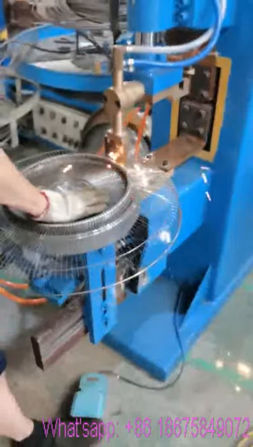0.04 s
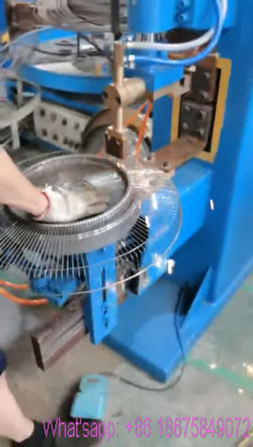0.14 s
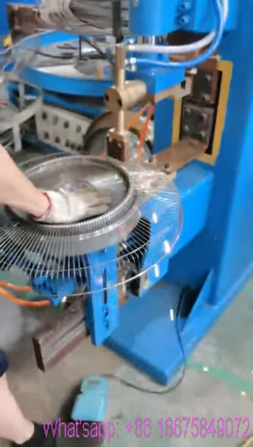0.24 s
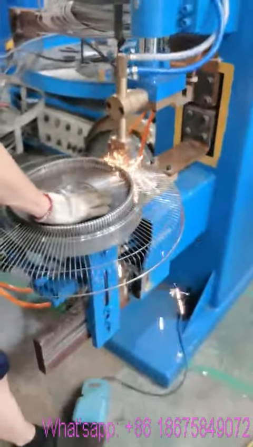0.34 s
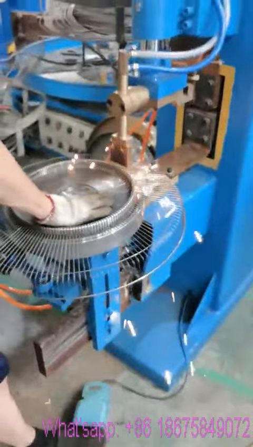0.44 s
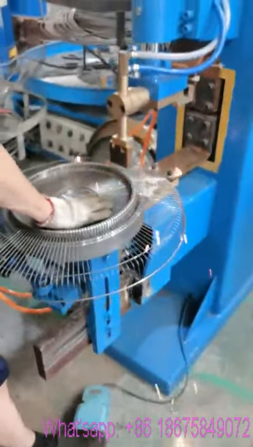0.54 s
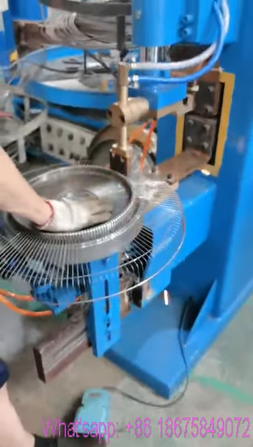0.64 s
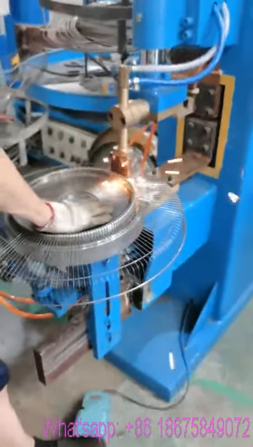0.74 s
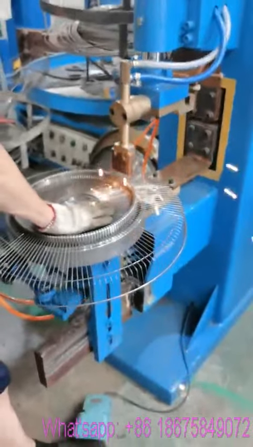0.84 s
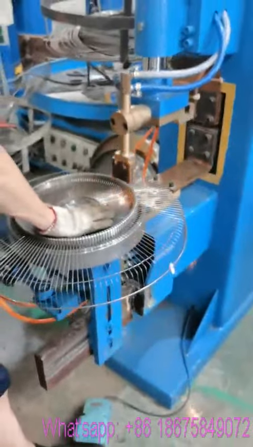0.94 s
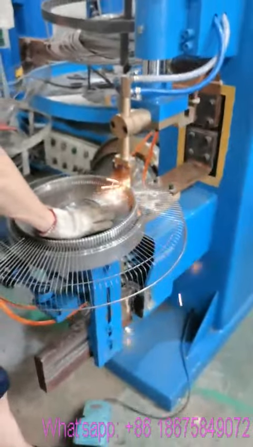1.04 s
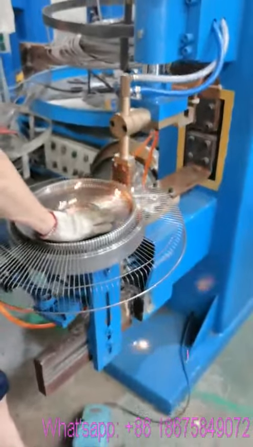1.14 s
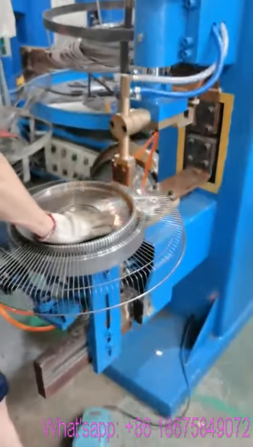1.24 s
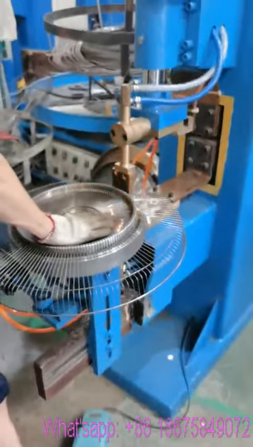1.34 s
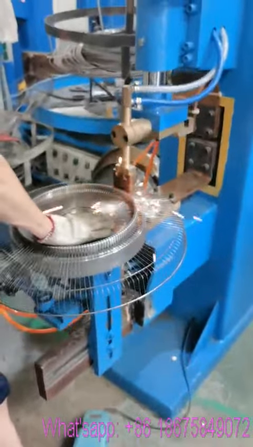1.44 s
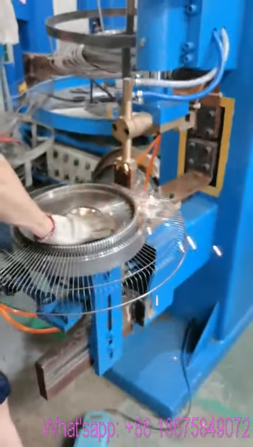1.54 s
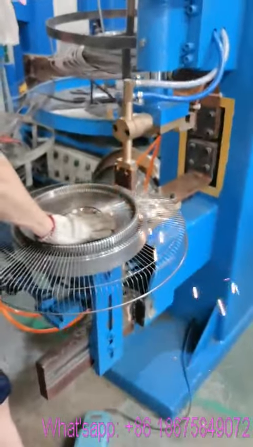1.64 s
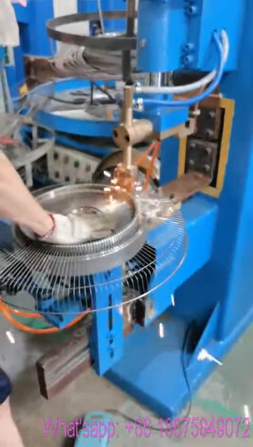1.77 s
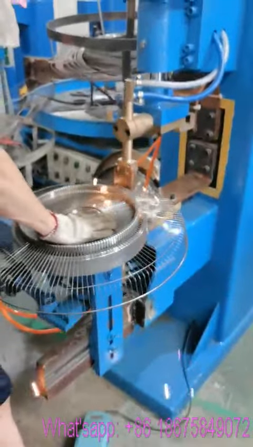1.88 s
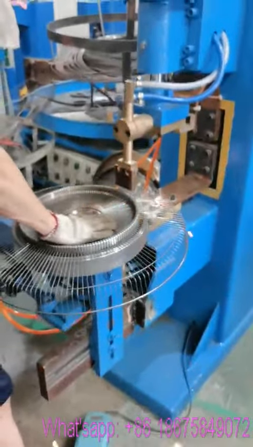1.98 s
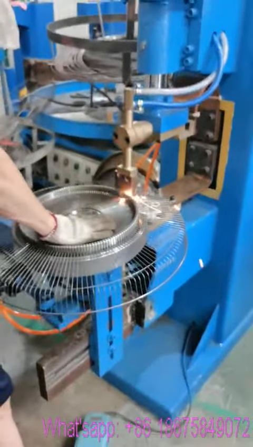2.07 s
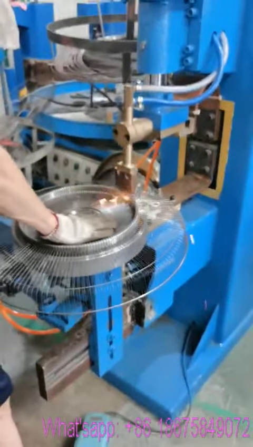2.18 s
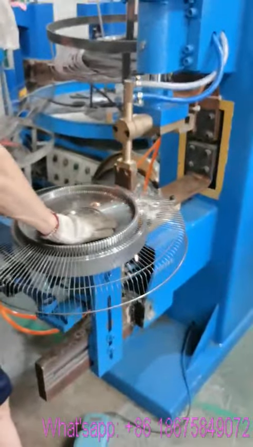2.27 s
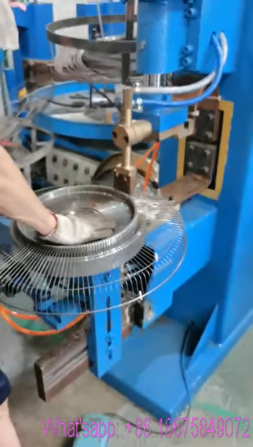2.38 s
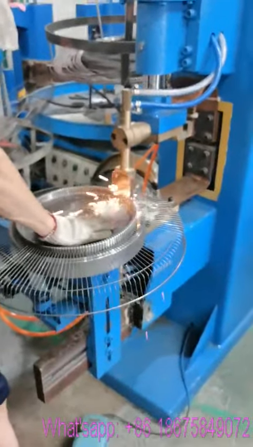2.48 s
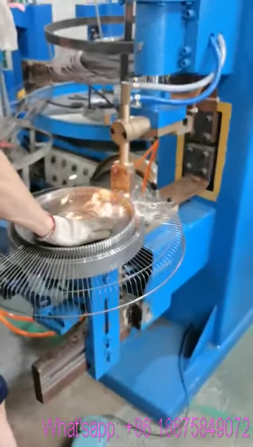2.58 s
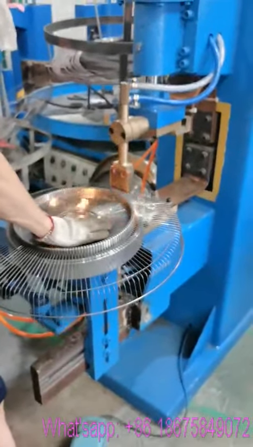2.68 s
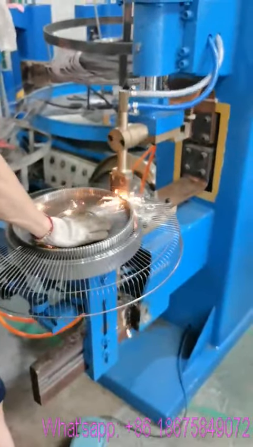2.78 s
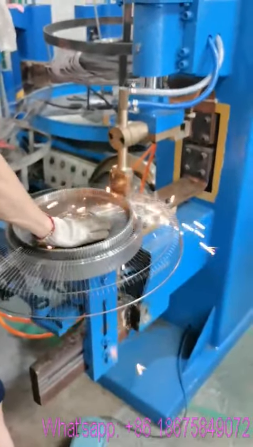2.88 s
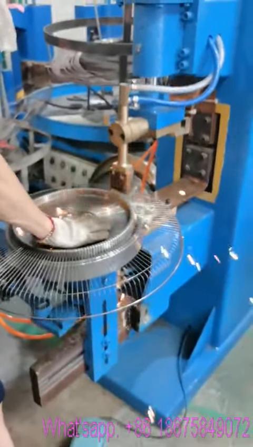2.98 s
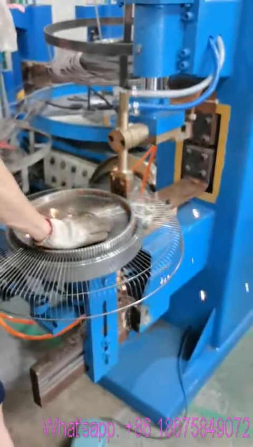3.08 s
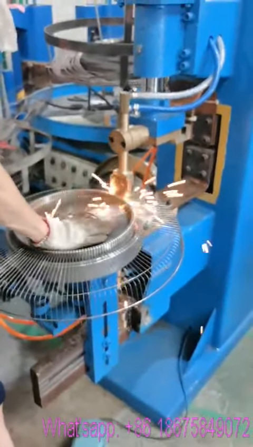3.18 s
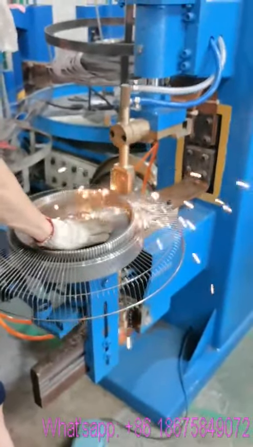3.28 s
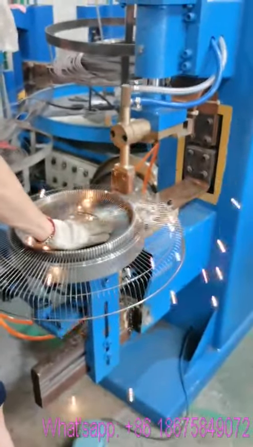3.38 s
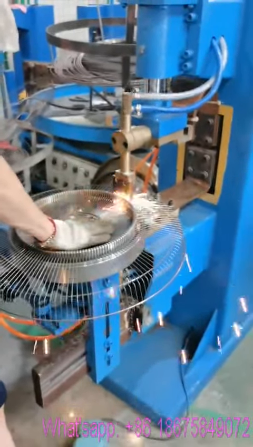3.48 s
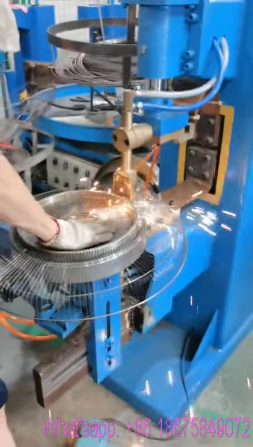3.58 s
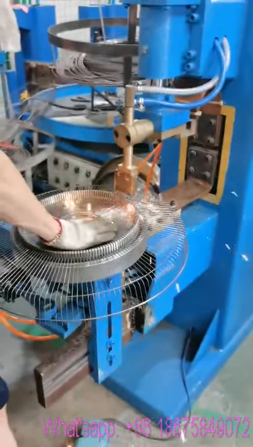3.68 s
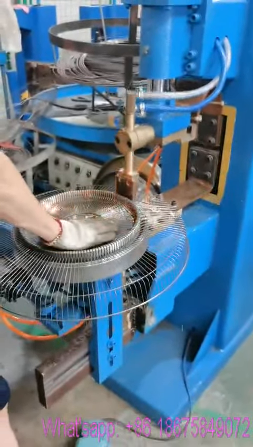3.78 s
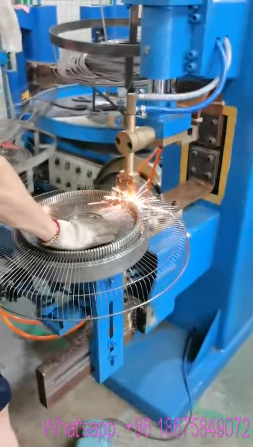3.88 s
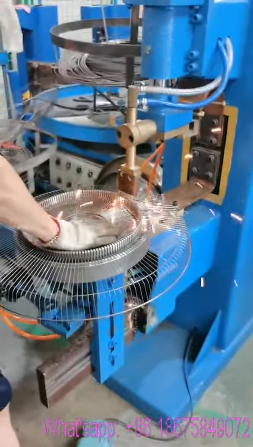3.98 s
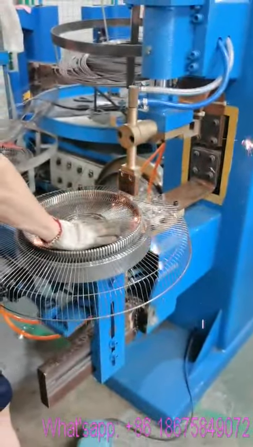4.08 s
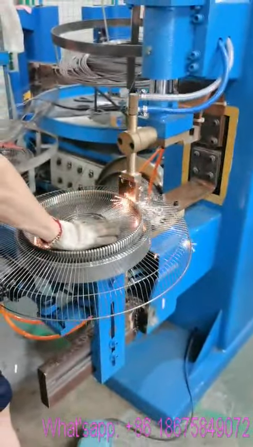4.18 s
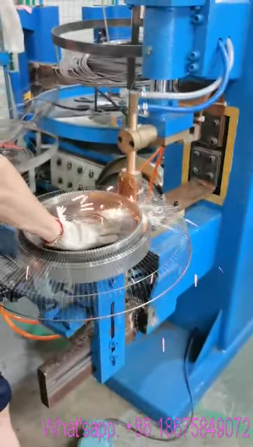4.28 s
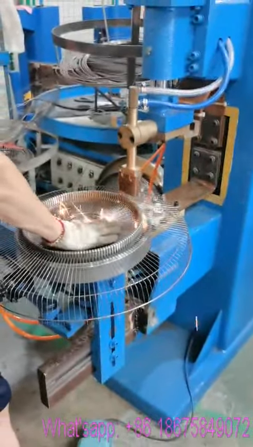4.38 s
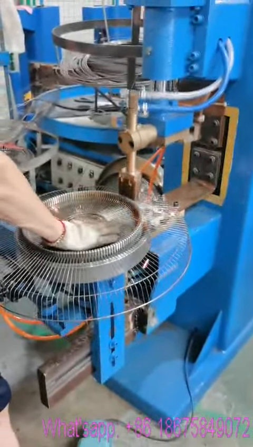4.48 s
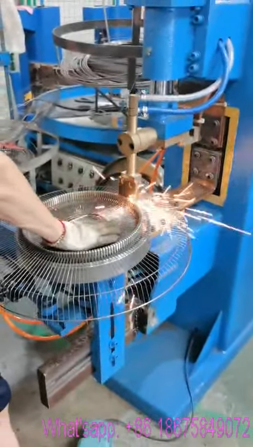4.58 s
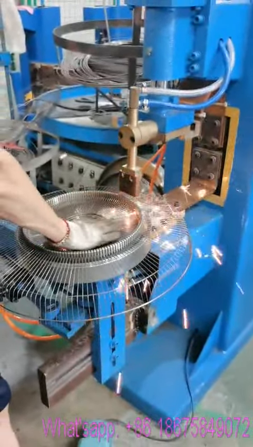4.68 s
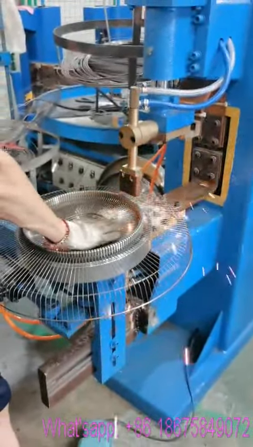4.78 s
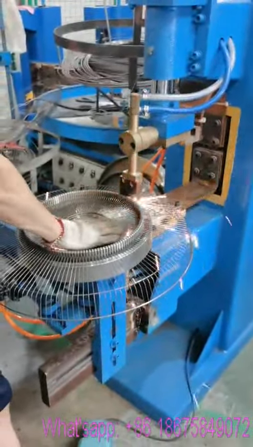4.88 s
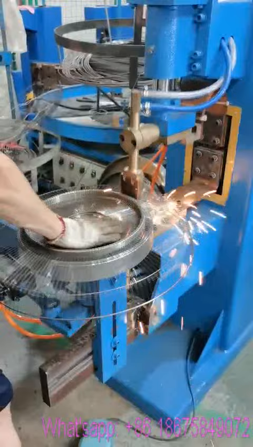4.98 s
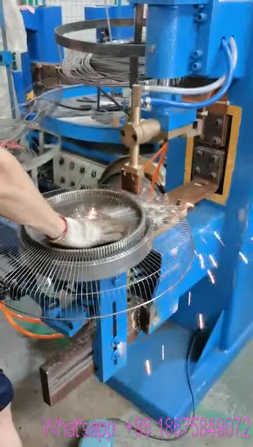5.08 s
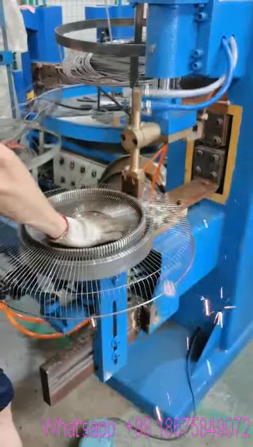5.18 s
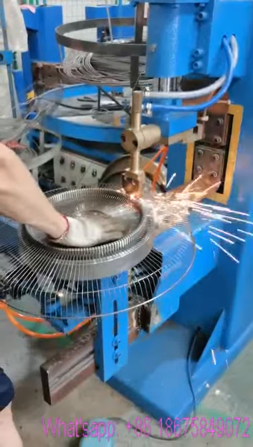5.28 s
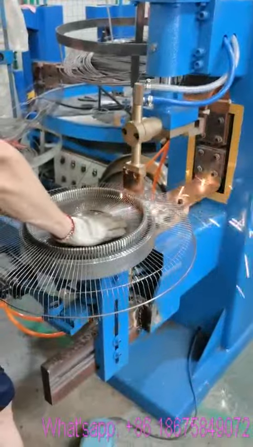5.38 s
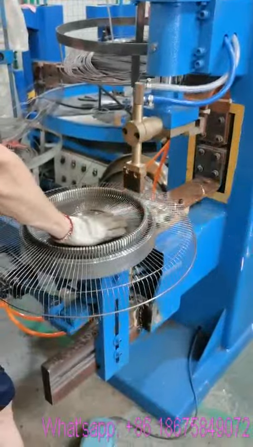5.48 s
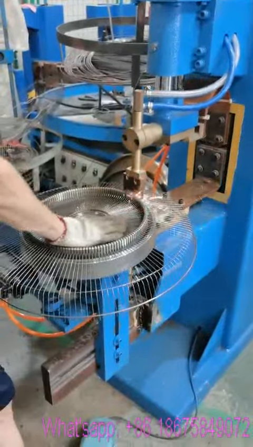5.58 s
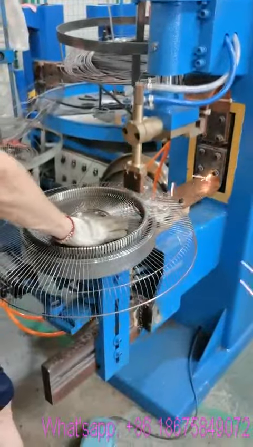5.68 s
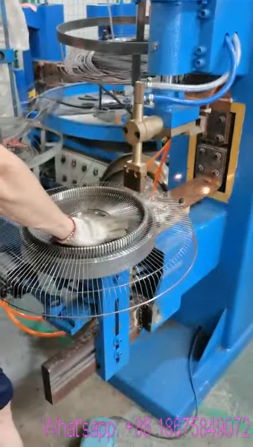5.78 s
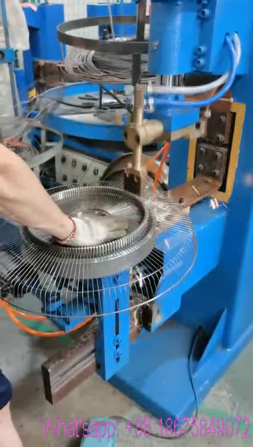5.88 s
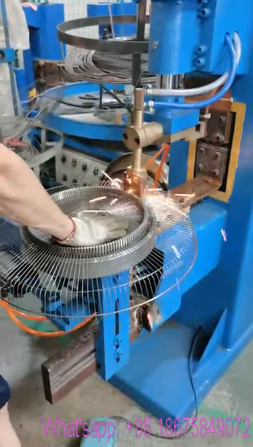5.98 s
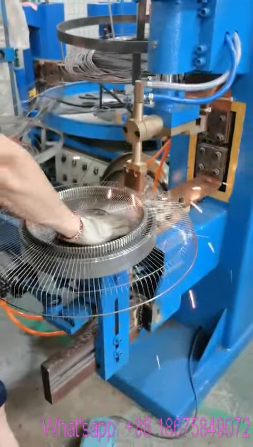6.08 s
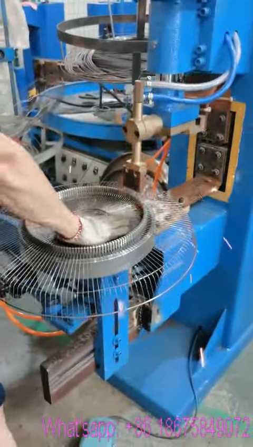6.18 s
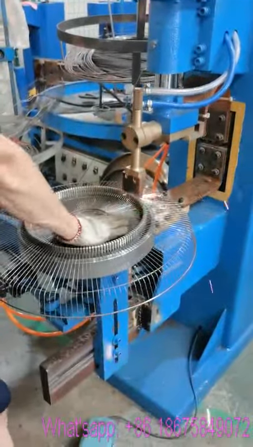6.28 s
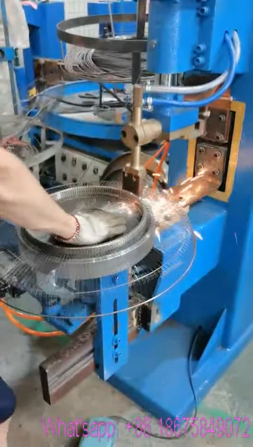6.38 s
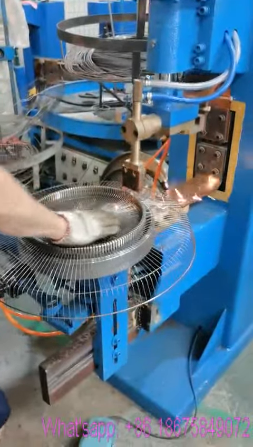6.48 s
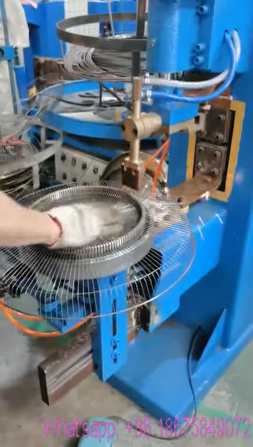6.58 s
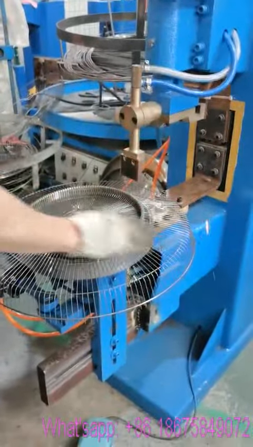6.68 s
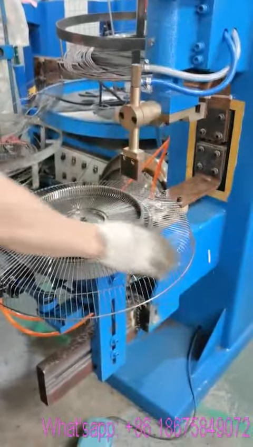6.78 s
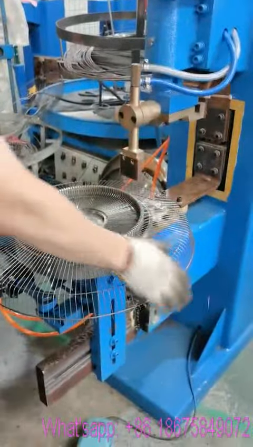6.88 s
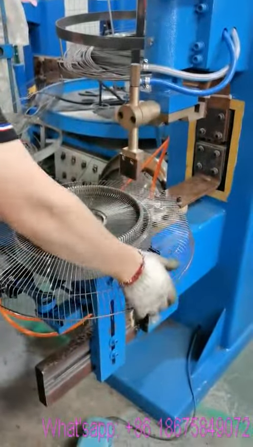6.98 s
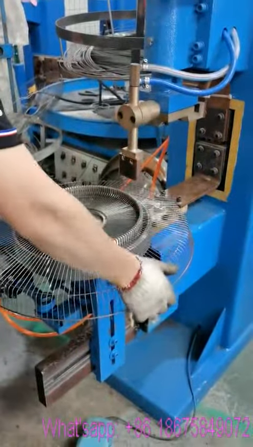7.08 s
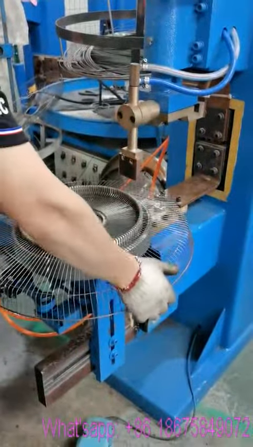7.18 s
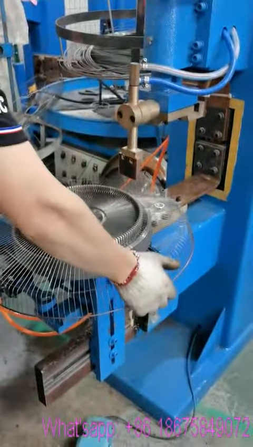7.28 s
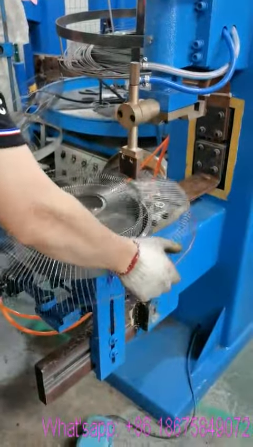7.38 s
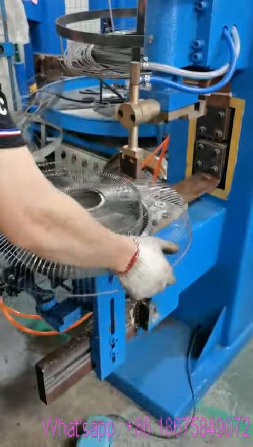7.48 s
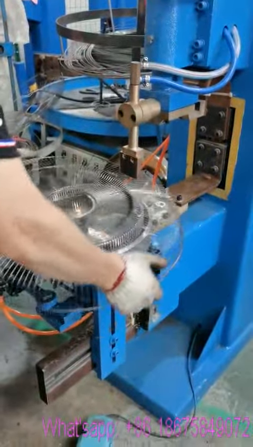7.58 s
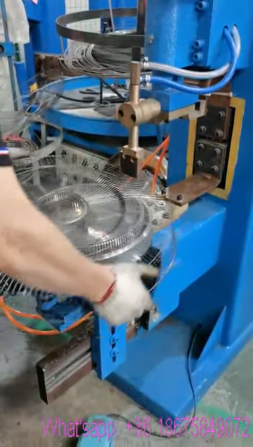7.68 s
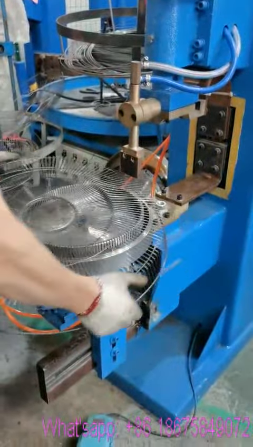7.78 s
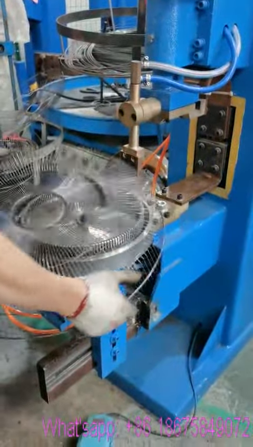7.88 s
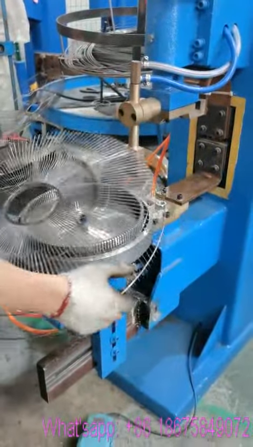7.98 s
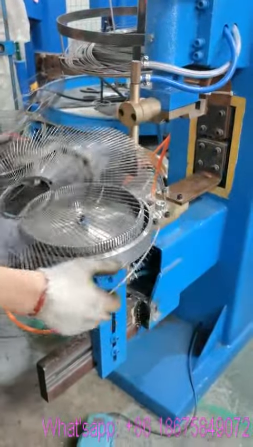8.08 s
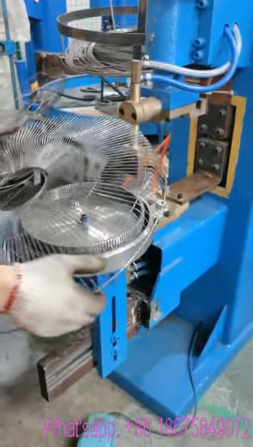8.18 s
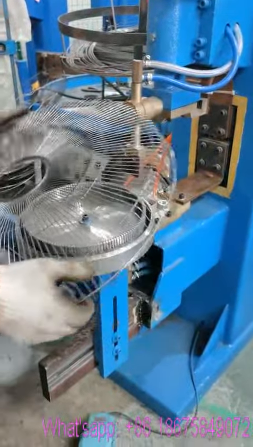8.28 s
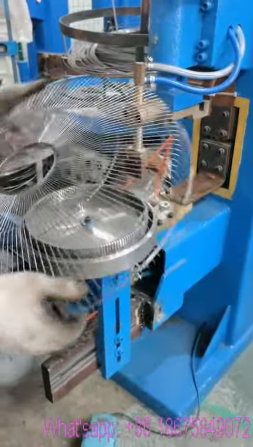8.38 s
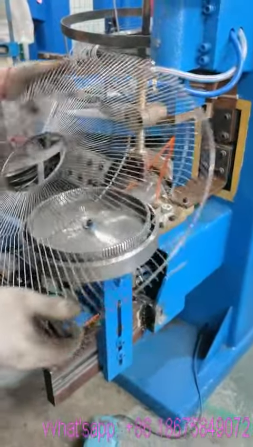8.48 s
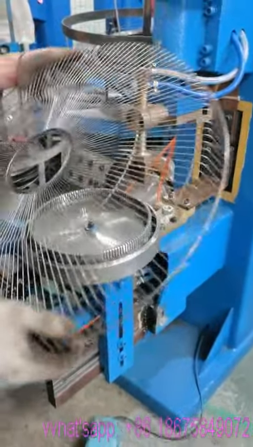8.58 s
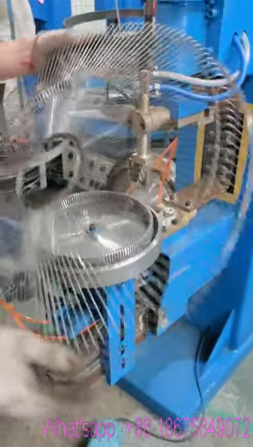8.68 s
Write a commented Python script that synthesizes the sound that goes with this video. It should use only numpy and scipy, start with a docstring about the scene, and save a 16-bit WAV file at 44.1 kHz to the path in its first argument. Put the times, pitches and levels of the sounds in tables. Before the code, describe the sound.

A pneumatic spot welder slams out hard metallic clacks nearly three times a second, sparks spitting, then stops, leaving faint scrapes and low workshop hum.

```python
"""In a workshop, close by, a pneumatic spot welder tacks a wire fan guard, nearly three strokes a second.
Each stroke: air rushes in, the electrode slams and bounces, sparks spit, the turntable thumps on, air vents,
the ram clacks back. Impacts excite decaying modes and noise; jets and sparks are shaped noise.
The last stroke breaks off soon after its slam, with thin hisses, two knocks of the rocking frame, faint
scrapes and a small puff of air. The shop's hum runs throughout and slowly grows louder near the end."""
import sys
import numpy as np
from scipy import signal
from scipy.fft import rfft, irfft, next_fast_len
from scipy.io import wavfile

SR = 44100
rng = np.random.default_rng(int(sys.argv[2]) if len(sys.argv) > 2 else 0)


def generate_wav(signal):
    """Clip the signal to [-1, 1] and save it as 16-bit WAV at the path in sys.argv[1]."""
    frames = np.transpose(np.atleast_2d(signal))
    scaled = np.clip(frames, -1, 1) * 32767
    pcm = np.round(scaled).astype(np.int16)
    wavfile.write(sys.argv[1], SR, pcm)


N = 385434
SPAN = 32768  # length of one stroke or one response [samples]
T = np.arange(SPAN) / SR  # time within it [s]
LEAD_S = .07  # a stroke begins this long before its slam

# ringing of electrode, jig and wire guard: (frequency [Hz], relative level [dB], t60 [s])
STEEL_MODES = [(620, -4, .18), (818, -7, .2), (978, 1, .16), (1082, -4, .25), (1180, -2, .3),
               (1250, -4, .22), (1502, -6, .14), (1945, 3, .11), (2136, -5, .12), (2355, -2, .11),
               (2466, -5, .12), (2707, -5, .15), (2923, -7, .12), (3300, -5, .08), (4355, -11, .05),
               (5103, -11, .05), (5760, -11, .05)]
# spectrum of clattering steel: (frequency [Hz], relative level [dB])
CLATTER_SPECTRUM = [(100, -10.5), (400, -28.5), (700, -3.5), (1100, 1.5), (1650, -3.5), (2300, -5),
                    (3300, -6.5), (4200, -10.5), (5500, -9.5), (7500, -14.5), (12000, -18.5), (16000, -24)]
# dull thud of base plate and floor: (frequency [Hz], relative level [dB])
THUD_SPECTRUM = [(30, -15), (80, -16), (125, -7.5), (200, -2.5), (280, -1), (360, -12), (480, -3.5),
                 (640, 3.5), (900, -18), (1600, -51)]
# spectrum of the air jets: (frequency [Hz], relative level [dB])
AIR_SPECTRUM = [(300, -7), (1500, 2), (3000, 7), (5000, 1.5), (8000, 6.5), (12000, 7), (16000, 4.5)]
# stereo width, side against middle: (frequency [Hz], relative level [dB])
WIDTH = [(120, -17), (280, -13), (600, -8), (1200, 4.5), (8000, 3)]


def undb(db):
    """Amplitude gain is ten to the power of a twentieth of the decibels."""
    return 10 ** (np.asarray(db) / 20)


def interpolate(points, hz):
    """Pitch follows the logarithm of frequency, so (Hz, value) tables are read on a log axis."""
    f, v = np.transpose(points)
    return np.interp(np.log(np.maximum(hz, 1)), np.log(f), v)


def unit(x):
    """Normalize mean power: scale to rms 1."""
    return x / np.sqrt(np.mean(x ** 2))


def unit_blow(x):
    """Normalize energy: as much as a hundredth of a second at rms 1."""
    return unit(x) / np.sqrt(SPAN / SR * 100)


def fade(t60):
    """Exponential damping: the amplitude falls 60 dB in t60 seconds."""
    return np.exp(-np.log(1000) * T / t60)


def swell(t, rise, decay):
    """Relaxation: a quick rise and an exponential fall, starting at t = 0."""
    t = np.maximum(t, 0)
    return (1 - np.exp(-t / rise)) * np.exp(-t / decay)


def shape(x, gain):
    """Linear filtering: multiply the spectrum by a gain that is a function of frequency."""
    n = next_fast_len(x.shape[-1])
    spectrum = rfft(x, n) * gain(np.fft.rfftfreq(n, 1 / SR))
    return irfft(spectrum, n)[..., :x.shape[-1]]


def soften(x, hz):
    """Two-pole low-pass: a softer contact or a duller jet carries less treble."""
    return signal.sosfilt(signal.butter(2, min(hz, .45 * SR), fs=SR, output="sos"), x)


def noise(spectrum, size, side_db=0):
    """Coloured noise from partly correlated channels, nearly alike on both sides in the bass."""
    mid, side = rng.standard_normal((2, size))
    side = shape(side, lambda f: undb(interpolate(WIDTH, f) + side_db))
    stereo = np.array([mid + side, mid - side])
    return unit(shape(stereo, lambda f: undb(interpolate(spectrum, f))))


def hiss(hz, width):
    """Noise through one resonance, swelling and sinking a little."""
    flutter = unit(shape(rng.standard_normal(N), lambda f: np.exp(-(f / 5) ** 2)))
    resonance = lambda f: 1 / (1 + (2 * (f - hz) / width) ** 2)
    band = unit(shape(rng.standard_normal((2, N)), resonance))
    return band * undb(2 * flutter)


def add(out, x, s):
    """Superposition: mix x in at time s, cut to the length of out."""
    i = int(round(s * SR))
    a, b = max(i, 0), min(i + x.shape[-1], out.shape[-1])
    out[..., a:b] += x[..., a - i:b - i]


def ring(modes, scatter_db, detune, spread):
    """Modal superposition: damped sines, varied at each call, out of phase between sides where wide."""
    out = 0
    for k, (hz, db, t60) in enumerate(modes):
        size, pitch = rng.standard_normal(2)
        sign = (-1) ** k
        lag = sign * spread * undb(interpolate(WIDTH, hz)) * np.array([[.5], [-.5]])
        phase = 2 * np.pi * hz * (1 + detune * pitch) * T + lag
        out = out + sign * undb(db + scatter_db * size) * fade(t60) * np.sin(phase)
    return unit_blow(out)


def welder(firming_db=2.5, last_db=-2.0, last_rock_db=-2):
    """A periodic train of slowly firmer strokes; the last is softer, breaks off early and rocks twice."""
    # Steel meeting steel, in turn: inlet valve opens; electrode touches the wire; ram seats behind it;
    # guard slaps the jig; turntable reaches its next notch; valve switches back; ram reaches the top;
    # indexing pawl drops back. (time after slam [s], relative level [dB], brightness [Hz],
    # first rebound after [s], loss per rebound [dB], share of brightness kept per rebound, at most 1)
    blow_rows = [(-.041, -27.5, 690, .007, 9, 0.61), (.0001, -19.5, 14100, 0.0028, 6, .6),
                 (.0042, -13, 14600, .0032, 13, 0.57), (.018, -17, 1340, .012, 2.5, 0.83),
                 (.05, -13.5, 640, .0068, 0, 0.88), (.113, -37.5, 646, 0.0071, -0.5, .95),
                 (.1532, -24, 10200, .003, 0.24, 0.49), (.189, -29.5, 8500, .003, 1.35, 0.78)]
    # Moving masses shove the frame, in turn: ram sets off; electrode presses home; turntable starts;
    # turntable stops; its lock drops in; ram lifts off; ram is back at the top.
    # (time after slam [s], relative level [dB], push length [s])
    shove_rows = [(-.045, -27.5, 0.00078), (.011, -24.5, 0.0004), (.023, -21, 0.0017),
                  (.0465, -15.5, .0012), (.0515, -20, 0.00056), (.111, -19.5, 0.0053), (.154, -30, 0.00062)]
    # air at the valve: (time after slam [s], relative level [dB], rise [s], decay [s], brightness [Hz])
    puff_rows = [(-.055, -29, .001, 0.066, 10100), (-.039, -18, 0.0036, 0.012, 15600),
                 (0.111, -32.5, 0.00065, 0.017, 14100), (0.121, -26.5, 0.0067, 0.034, 15700)]
    stroke_count, cycle_s, first_slam_s = 19, .35, -.0199
    last_end_s = .04  # the last stroke keeps only the tabled events before this time after its slam
    out = np.zeros((2, N))
    # noise shared by all strokes keeps them alike
    own_clatter = noise(CLATTER_SPECTRUM, SPAN, side_db=-8.5)
    own_thud = noise(THUD_SPECTRUM, SPAN)
    for k in range(stroke_count):
        last = k == stroke_count - 1
        blows, shoves, puffs = (
            [row for row in table if not last or row[0] < last_end_s]
            for table in (blow_rows, shove_rows, puff_rows))
        clacks = [clack for row in blows for clack in rebounds(*row)]
        knocks = rocking(last_rock_db)[:2] if last else rocking()
        firmness = undb(firming_db * k / stroke_count + last * last_db)
        stroke = firmness * (steel(clacks, own_clatter) + chatter() + sparks())
        stroke = stroke + frame(shoves + knocks, own_thud) + air(puffs)
        add(out, stroke, first_slam_s + k * cycle_s - LEAD_S)
    return out


def rebounds(s, db, hz, gap, loss_db, kept):
    """Inelastic bouncing: unevenly shrinking gaps; rows of (time [s], level [dB], brightness [Hz])."""
    count, gap_ratio, gap_scatter_db = 4, 0.96, .8
    k = np.arange(count)
    gaps = gap * gap_ratio ** k * undb(gap_scatter_db * rng.standard_normal(count))
    times = s + np.cumsum(gaps) - gaps
    return list(zip(times, db - loss_db * k, hz * min(kept, 1) ** k))


def contact(hz):
    """Contact stiffness sets the pulse's band: a hard one is bright and thin, a soft one dull and full."""
    thin = signal.butter(2, min(hz / 14, SR / 4), "highpass", fs=SR, output="sos")
    return signal.sosfilt(thin, soften(signal.unit_impulse(256), hz))


def steel(rows, own_clatter, crack=2.1, crack_t60=0.018):
    """Impulse excitation: hard contacts drive a dense short clatter and longer modes, varied per stroke."""
    force = np.zeros(SPAN // 2)
    for s, db, hz in rows:
        size_db, late_s = rng.standard_normal(2) * (1.2, .0003)
        add(force, undb(db + size_db) * contact(hz), LEAD_S + s + late_s)
    ring_down = fade(.13) + crack * fade(crack_t60)
    fresh_clatter = noise(CLATTER_SPECTRUM, SPAN, side_db=-6.0)
    clatter = unit_blow((own_clatter + fresh_clatter) * ring_down)
    body = clatter + undb(-7) * ring(STEEL_MODES, scatter_db=3, detune=.006, spread=1)
    return signal.fftconvolve(force[None], body)[:, :SPAN]


def chatter(db=-25, rise=0.0081, decay=0.088, bright_hz=1500):
    """Random impacts: the slam leaves loose wires rattling on the jig, differently every time."""
    taps = (rng.random(SPAN) < 900 / SR) * rng.standard_normal(SPAN)  # 900 a second on average
    wires = noise(CLATTER_SPECTRUM, SPAN, side_db=-8.5) * fade(0.01)
    rattle = signal.fftconvolve(soften(taps, bright_hz)[None], wires)[:, :SPAN]
    return undb(db) * unit(rattle) * swell(T - LEAD_S - .01, rise, decay)


def sparks(db=-38, bright_hz=9000):
    """Random impulses: molten metal spits in a dense crackle of small ticks, louder on some strokes."""
    happens = rng.random(SPAN) < 1500 / SR  # 1500 a second on average
    ticks = happens * rng.standard_normal(SPAN) * undb(3 * rng.exponential(size=SPAN))
    tick_response = (noise(AIR_SPECTRUM, SPAN) * fade(0.0027))[:, :256]
    crackle = signal.fftconvolve(soften(ticks, bright_hz)[None], tick_response)[:, :SPAN]
    spit = undb(3 * rng.standard_normal()) * swell(T - LEAD_S - .035, .008, .045)
    return undb(db) * unit(crackle) * spit


def rocking(trim_db=0):
    """Damped rocking: soft, loosely timed frame knocks; rows of (time [s], level [dB], push length [s])."""
    start_s, period_s, push_s, scatter_s = .08, 0.037, .0022, 0.00304
    first_db, loss_db, count = -23.5, .5, 6  # loss per knock
    late_s = scatter_s * rng.standard_normal(count)
    return [(start_s + k * period_s + late, first_db + trim_db - k * loss_db, push_s)
            for k, late in enumerate(late_s)]


def frame(rows, own_thud, thud_db=-5, thud_t60=0.31, db=-1):
    """Forced modes: half-sine pushes boom in the frame and thud in its base, nearly alike every stroke."""
    # the heavy frame: (frequency [Hz], relative level [dB], t60 [s])
    frame_modes = [(39, -28, .3), (76, -14, .25), (122, -5, .22), (178, -2, .24), (212, 0, .13),
                   (294, -3, .2), (425, -13, .08), (477, -6, .1), (618, 1, .08)]
    force = np.zeros(SPAN // 2)
    for s, push_db, length in rows:
        push = np.sin(np.pi * np.minimum(T / length, 1))
        size = undb(push_db + .5 * rng.standard_normal())
        add(force, size * push / push.sum(), LEAD_S + s)
    boom = ring(frame_modes, scatter_db=1, detune=.004, spread=1)
    thud = unit_blow((own_thud + noise(THUD_SPECTRUM, SPAN) / 2) * fade(thud_t60))
    body = boom + undb(thud_db) * thud
    return undb(db) * signal.fftconvolve(force[None], body)[:, :SPAN]


def air(rows):
    """Turbulent jet noise that dies away as the cylinder's pressure evens out."""
    jet = noise(AIR_SPECTRUM, SPAN)
    return sum(undb(db) * swell(T - LEAD_S - s, rise, decay) * soften(jet, hz)
               for s, db, rise, decay, hz in rows)


def handling(db=-56, start_s=6.5, rise=0.022, decay=0.74, bright_hz=1500):
    """Random contacts excite the modes: wires scrape the jig as a gloved hand lifts the guard."""
    taps = (rng.random(N) < 50 / SR) * rng.uniform(-1, 1, N)  # 50 a second on average
    wires = ring(STEEL_MODES, scatter_db=3, detune=.01, spread=1)
    wires = wires + unit_blow(noise(CLATTER_SPECTRUM, SPAN) * fade(.05)) / 2
    scrape = signal.fftconvolve(soften(taps, bright_hz)[None], wires)[:, :N]
    return undb(db) * unit(scrape) * swell(np.arange(N) / SR - start_s, rise, decay)


def puff_and_hisses(puff_db=-45):
    """Turbulent and resonant noise: a last soft puff, and thin hisses from the last slam onward."""
    # narrow hisses, from the last stroke's slam onward:
    # (time [s], frequency [Hz], width [Hz], relative level [dB], rise [s], decay [s])
    sings = [(6.301, 6100, 336, -38.5, 0.018, 0.12), (7.04, 6100, 380, -49.5, 0.021, 0.26),
             (7.09, 6700, 600, -54, .04, .12), (8.25, 4230, 380, -41, 0.6, 0.24)]
    t = np.arange(N) / SR
    out = undb(puff_db) * swell(t - 7.03, 0.033, 0.12) * noise(AIR_SPECTRUM, N)
    for s, hz, width, db, rise, decay in sings:
        out += undb(db) * swell(t - s, rise, decay) * hiss(hz, width)
    return out


def hall(x, wet_db=-9.5, build_s=.012):
    """Diffuse reverberation: noise decaying at its own rate in each band, convolved with the source."""
    # spectrum of the echoes: (frequency [Hz], relative level [dB])
    echo_spectrum = [(40, -3), (200, 1.5), (600, 8), (1200, -1.5), (3000, 1.5), (6000, -1), (10000, -3.5),
                     (16000, -8)]
    # decay of the echoes: (frequency [Hz], t60 [s])
    echo_t60 = [(100, 1), (1000, 0.58), (3000, 0.4), (8000, 0.53), (15000, 0.66)]
    wash, tail = noise(echo_spectrum, SPAN), 0
    centres = np.geomspace(60, 16000, num=9)
    for centre, weights in zip(centres, np.eye(len(centres))):
        band = list(zip(centres, weights))  # a triangle around one centre
        tail = tail + shape(wash, lambda f: interpolate(band, f)) * fade(interpolate(echo_t60, centre))
    tail = unit(tail * (1 - np.exp(-T / build_s)) ** 2) / np.sqrt(SPAN)
    return undb(wet_db) * signal.fftconvolve(x, tail, axes=1)[:, :N]


def shop(db=-44.0, hum_db=-3.0, waver_hz=0.83):
    """Broadband rumble and amplitude-modulated hum of other machines, slowly louder near the end."""
    # rumble of the workshop: (frequency [Hz], relative level [dB])
    rumble_spectrum = [(15, -38), (25, -1.5), (82, -1), (263, -6), (293, -2), (326, -10), (560, -11.5),
                       (659, -13.5), (1040, -22.5), (1840, -26), (4140, -35.5), (5430, -40), (8590, -41.5),
                       (16000, -48)]
    # hum of other machines: (frequency [Hz], relative level [dB])
    hum_lines = [(80.7, -54), (113.0, -67), (166.9, -58), (231.5, -56), (1034, -69)]
    rise_start_s, rise_db_per_s = 7.2, 1.7
    t = np.arange(N) / SR
    drift = undb(rise_db_per_s * np.maximum(t - rise_start_s, 0))
    wavers = shape(rng.standard_normal((len(hum_lines), N)), lambda f: np.exp(-(f / waver_hz) ** 2))
    hum = 0
    for (hz, line_db), waver in zip(hum_lines, wavers):
        tone = (1 + unit(waver)) * np.sin(2 * np.pi * hz * t)
        hum = hum + undb(line_db + hum_db) * unit(tone)
    return drift * (undb(db) * noise(rumble_spectrum, N) + hum)


def shop_hisses():
    """Band-limited noise: narrow and broad hisses heard throughout in the shop."""
    # (frequency [Hz], width [Hz], relative level [dB])
    hiss_bands = [(1030, 64, -60), (4250, 580, -63), (8290, 210, -66), (12700, 3600, -67.5)]
    return sum(undb(db) * hiss(hz, width) for hz, width, db in hiss_bands)


def scene(shop_left_db=3.0):
    """Superposition of the welder, its echo and the shop, whose sound is a little louder on the left."""
    machine = welder() + handling()
    balance = undb(shop_left_db * np.array([[.5], [-.5]]))
    around = (shop() + shop_hisses()) * balance
    return machine + hall(machine) + puff_and_hisses() + around


def port(x, resonances):
    """Duct resonance: second-order peaks and dips of a microphone's sound duct."""
    for hz, width, db in resonances:
        w, g = 2 * np.pi * hz / SR, undb(db / 2)
        a = np.sin(w) * width / hz / 2
        zeros = [1 + a * g, -2 * np.cos(w), 1 - a * g]
        poles = [1 + a / g, -2 * np.cos(w), 1 - a / g]
        x = signal.lfilter(zeros, poles, x)
    return x


def record(dry):
    """Resonance, clipping and band limit: ports colour each side, peaks clip, the top is cut."""
    # resonances of the two microphone ports: (frequency [Hz], width [Hz], level [dB])
    left_port = [(8966, 1300, 13.5)]
    right_port = [(2856, 720, 8.5), (7900, 810, -35)]
    heard = np.clip([port(dry[0], left_port), port(dry[1], right_port)], -1, 1)
    top_cut = signal.ellip(8, .2, 70, 16000, fs=SR, output="sos")  # order, ripple dB, stop dB, edge Hz
    return signal.sosfilt(top_cut, heard)


dry = scene()
out = record(dry)
generate_wav(out)
```